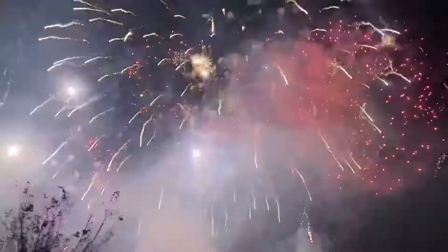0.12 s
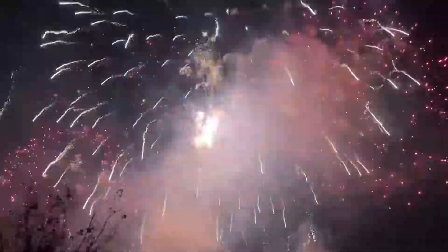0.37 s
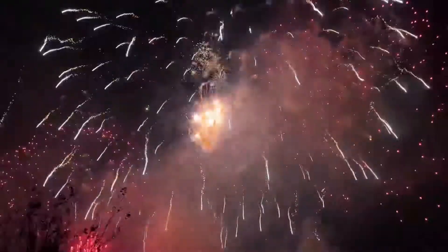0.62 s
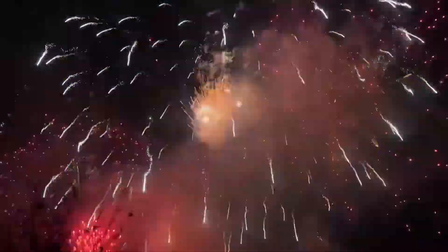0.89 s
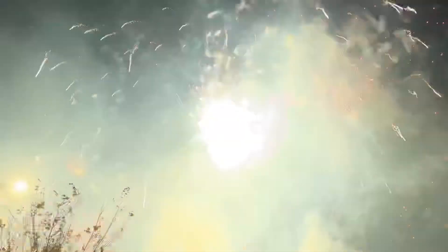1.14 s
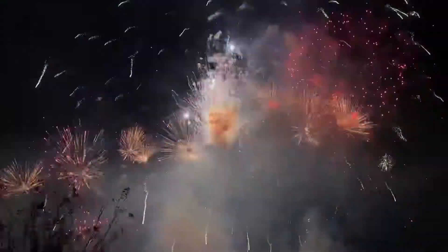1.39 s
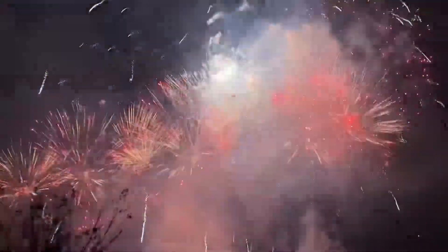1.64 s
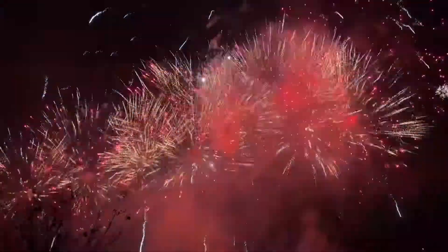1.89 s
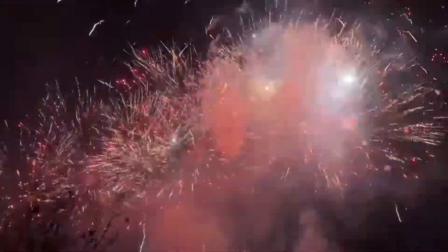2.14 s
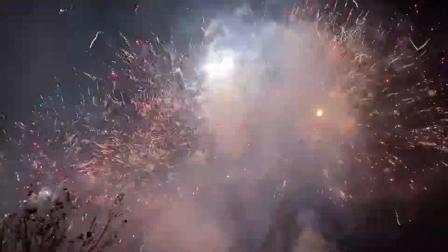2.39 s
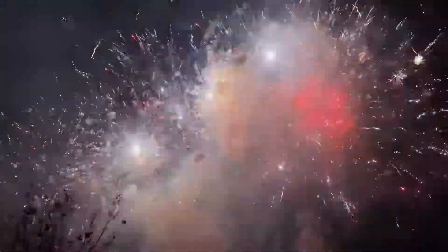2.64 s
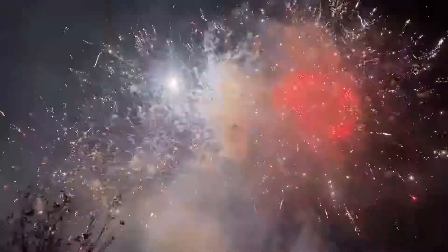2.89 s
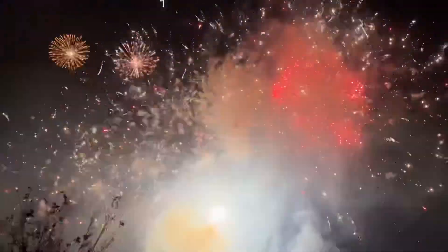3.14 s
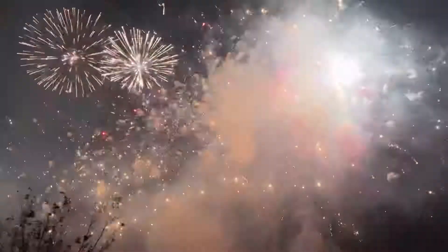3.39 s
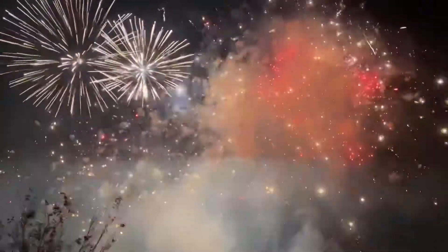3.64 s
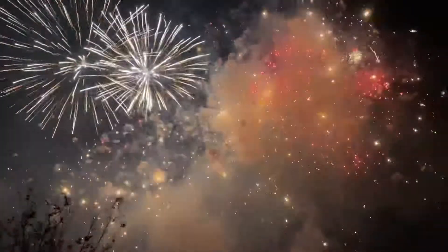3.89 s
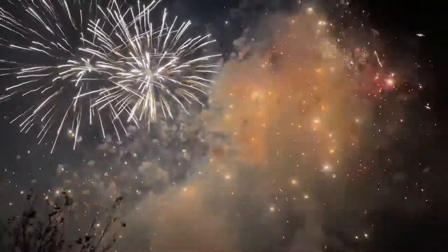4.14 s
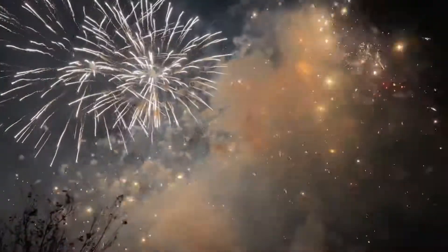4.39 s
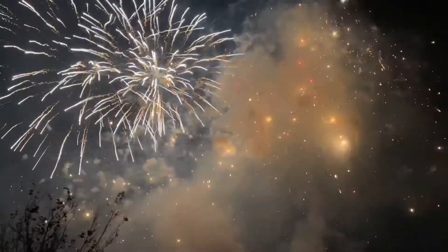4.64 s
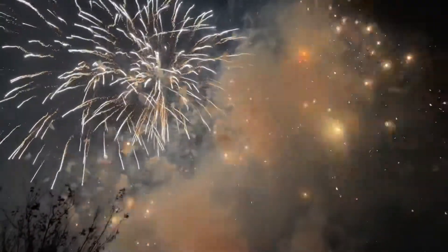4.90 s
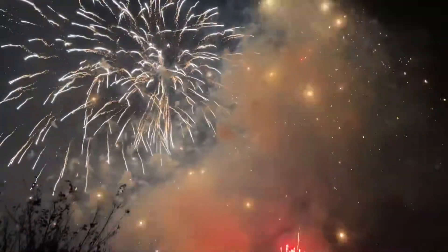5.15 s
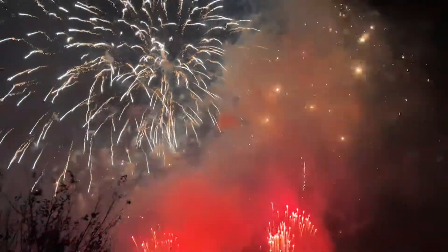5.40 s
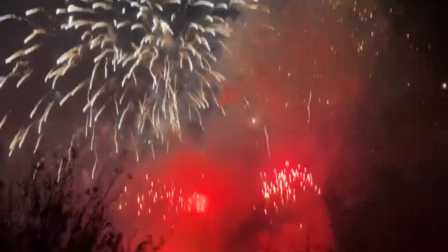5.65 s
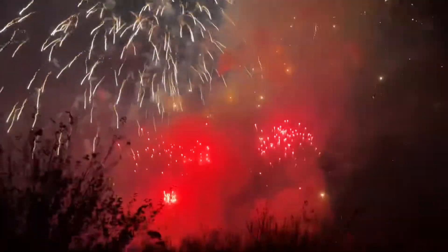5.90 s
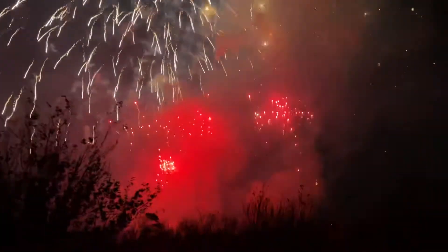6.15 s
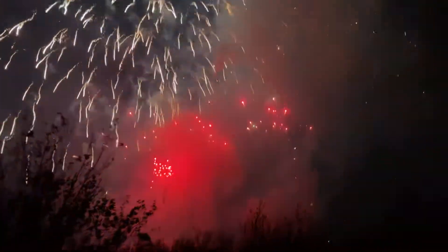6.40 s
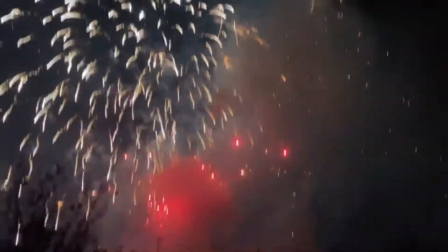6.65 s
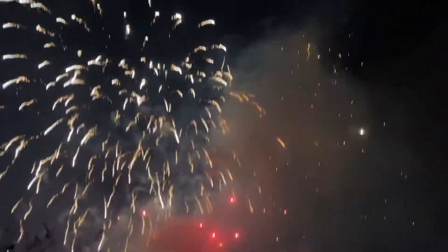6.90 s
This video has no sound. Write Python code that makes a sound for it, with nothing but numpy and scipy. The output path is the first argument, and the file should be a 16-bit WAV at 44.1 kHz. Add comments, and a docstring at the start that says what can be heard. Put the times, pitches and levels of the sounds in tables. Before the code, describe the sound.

Firework shells crackle at machine-gun density in the open air, loud and slightly squashed by a small recorder. A very brief, faint rising whistle is buried early, along with a deep mortar thump. After three seconds the bursts grow sparser and stop; echo from distant slopes decays. Several punchy launches crack near five seconds, one duller thud follows, then only rolling reverberation and tiny faint ticks.

```python
"""Hundreds of firework shells burst overhead at night; a brief rising whistle sounds among the first ones.
A mortar fires early; after the barrage has ended more crack and thump. Echo rolls over a faint rumble.
Each burst is a blast wave with a ground bounce and a noise crack; the recorder's filters smear it into
a falling chirp. Echoes are noise that takes up the sound's energy and decays at a rate set by frequency."""
import sys
import numpy as np
from scipy import signal
from scipy.fft import rfft, irfft, next_fast_len
from scipy.io import wavfile
from scipy.ndimage import uniform_filter1d

SR = 44100
rng = np.random.default_rng(int(sys.argv[2]) if len(sys.argv) > 2 else 0)


def dump_mix(stems):
    """Bounce the given channels to the path in sys.argv[1] as a 16-bit WAV at rate SR."""
    frames = np.atleast_2d(stems).T  # one column per channel
    limited = np.clip(frames, -1, 1)  # hard clip at full scale
    pcm = np.round(limited * 32767).astype(np.int16)
    wavfile.write(sys.argv[1], SR, pcm)


def boost(x):
    """Linear amplitude factor 10**(x/20) for a level x in decibels (scalar or array-like)."""
    u = np.asarray(x, float) / 20
    return 10 ** u


N = 310002
LEAD_IN = 2 * SR  # samples ahead of the start, so that echoes of earlier bursts are already rolling

# bursts and their slap echoes, placed one by one: t/s, blast level/dB, blast duration/ms, treble at 6 kHz/dB
PLACED_BURSTS = [(0.0499, -5.5, 0.52, 2), (0.065, -11.5, 1.2, 1), (0.0861, -14.5, 1.4, 4),
                 (0.1, -15, 0.53, 1), (0.1366, -7.5, 0.71, 5), (0.152, -11, 0.47, -9), (0.173, -9, 1.9, -2),
                 (0.1836, 2, 0.22, -4.5), (0.194, -14.5, 1.6, 4.5), (0.208, -9, 0.37, -2.5),
                 (0.2215, -6, 0.49, 4), (0.236, -7, 0.55, 7), (0.2421, -9, 0.87, -7),
                 (0.2525, -12.5, 0.31, 3), (0.2556, -5.5, 0.53, -9), (0.27, -12, 0.3, -13),
                 (0.3041, -8, 0.76, -2), (0.3204, -1, 0.26, -3), (0.3301, -15.5, 1.2, 1.5),
                 (0.3439, 1.5, 0.18, -6.5), (0.364, -8, 0.89, 4.5), (0.379, -15.5, 1, 1),
                 (0.408, -16.5, 1.1, -2), (0.416, -11.5, 0.91, 2), (0.421, -8, 0.83, 7),
                 (0.4473, -6, 0.64, 1), (0.4628, -12.5, 1, -5.5), (0.5339, -4, 1.9, 7.5),
                 (0.541, 5.5, 0.1, -9.5), (0.5491, -2, 0.23, -5.5), (0.5638, -6, 0.34, 3.5),
                 (0.5713, -6.5, 0.43, -2.5), (0.5746, -4, 0.41, 3.5), (0.591, -14.5, 0.54, -2),
                 (0.623, -3, 0.64, 1.5), (0.641, -14, 1.1, 6.5), (0.644, -9.5, 0.48, -5.5),
                 (0.6562, -9, 0.68, -3.5), (0.6596, 0, 0.24, -3), (0.6758, -8.5, 0.44, 0),
                 (0.688, -10, 2.2, -0.5), (0.709, -4.5, 0.3, -1.5), (0.721, -4.5, 0.29, -14.5),
                 (0.7495, -14.5, 0.38, -0.5), (0.7582, -11, 0.91, 0), (0.7763, -17, 0.93, 7),
                 (0.7911, -4, 0.87, -3.5), (0.7981, -16.5, 0.66, 0), (0.8065, -6, 1.1, -1.5),
                 (0.809, -10, 0.68, 0.5), (0.816, -6.5, 0.52, -0.5), (0.826, -6, 0.29, 1),
                 (0.857, -9.5, 0.32, 1.5), (0.866, -11.5, 0.31, 4.5), (0.8712, -8, 0.48, -7),
                 (0.9075, -6, 0.61, 3.5), (0.922, -8, 0.69, 0), (0.9389, -15, 1.5, -3),
                 (0.9453, -9, 0.83, 1.5), (0.958, -13, 0.81, -3.5), (0.997, -18.5, 0.56, 3),
                 (1.0091, -2.5, 0.14, 0.5), (1.014, -4, 0.56, -8.5), (1.0217, -10.5, 0.67, -2),
                 (1.061, -9.5, 0.82, -3), (1.1212, -11.5, 1.1, 1), (1.1253, -11.5, 0.79, -8),
                 (1.1373, -9, 1, -1), (1.152, -14, 0.83, 0.5), (1.1878, -7.5, 0.69, 0),
                 (1.1965, -6, 0.62, -2), (1.2666, -8, 0.99, 3.5), (1.2791, -11, 0.43, -4.5),
                 (1.3001, -2.5, 0.86, 1), (1.3033, -12, 1.04, -1), (1.3132, -4.5, 0.22, 0),
                 (1.3161, -5, 0.23, -3.5), (1.3458, -5, 0.51, 3.5), (1.3541, -9.5, 0.63, 0.5),
                 (1.3586, -9.5, 1.5, -2), (1.361, -1.5, 0.29, 0.5), (1.372, -10, 0.64, 3),
                 (1.378, -22.5, 0.49, -2.5), (1.3978, -4, 1.1, 1.5), (1.4057, -8.5, 0.96, 1),
                 (1.411, -5.5, 0.45, -9), (1.4446, -4.5, 0.62, 6), (1.476, 0, 0.38, -0.5),
                 (1.484, -2.5, 0.35, 2), (1.4937, -7.5, 0.73, -0.5), (1.5, -8, 1.05, -11),
                 (1.513, -4, 1, 5), (1.5252, -7.5, 0.68, -1), (1.5432, -9, 0.45, -2.5),
                 (1.548, -15.5, 0.28, -3), (1.5668, -17, 0.47, -4), (1.5828, -19.5, 0.76, 10),
                 (1.589, -13, 0.51, -2.5), (1.5995, -13.5, 0.92, 5), (1.6055, -7, 0.83, -4),
                 (1.6288, -8.5, 1.2, -8.5), (1.652, -11, 0.45, 3.5), (1.657, -6.5, 0.21, -2),
                 (1.6725, -3, 0.45, -3), (1.6862, -9, 1.3, 8), (1.7009, -6, 0.3, 0), (1.7154, -13, 0.51, 4),
                 (1.7253, -7, 0.47, -1), (1.7313, -10, 0.9, 5), (1.7362, -12.5, 0.32, 4),
                 (1.743, -8.5, 0.35, -4), (1.7656, -4, 0.48, -2), (1.7768, -17, 0.46, 7),
                 (1.787, -8, 0.17, -1.5), (1.792, -13.5, 0.77, 2.5), (1.802, -8, 0.7, 4),
                 (1.8049, -11.5, 0.31, -5), (1.8153, -5, 0.57, 2), (1.8211, -8, 0.93, 2),
                 (1.8335, -0.5, 0.53, 0.5), (1.8381, -6, 1.5, 6), (1.847, -4.5, 0.33, -1),
                 (1.8523, -8.5, 0.57, -6.5), (1.8572, -10, 0.43, 2.5), (1.866, -6, 0.49, 4.5),
                 (1.8756, -8, 0.22, 2.5), (1.881, -10, 0.36, -0.5), (1.8868, -15, 0.46, -3.5),
                 (1.9, -14.5, 0.92, -2), (1.9064, -14, 0.56, 0), (1.9161, -8, 0.55, 3.5),
                 (1.921, -0.5, 0.22, 1.5), (1.9316, -4, 0.81, -3), (1.938, -11, 0.48, 6.5),
                 (1.954, -11, 0.83, 3.5), (1.971, -9, 0.53, 7), (1.9794, -13, 0.47, -0.5),
                 (1.9868, -17, 0.68, -2), (1.995, -13.5, 0.86, -7.5), (2.021, -14, 0.32, 1.5),
                 (2.0382, -16, 0.75, 2), (2.044, -5.5, 0.35, -1), (2.069, -3, 0.52, -1),
                 (2.0767, -11.5, 0.48, 2), (2.08, -12, 0.63, 1), (2.0884, -10, 0.9, 4.5),
                 (2.0954, -5, 0.49, 0.5), (2.1028, -7, 0.28, 4), (2.108, -12, 0.6, 1.5),
                 (2.114, -8, 1.2, -3), (2.14, -14.5, 0.4, 5), (2.1482, -10.5, 1.3, 2),
                 (2.1613, -14, 0.2, -8), (2.1727, -6.5, 0.13, -2.5), (2.1785, -20.5, 0.21, 2.5),
                 (2.197, -8, 0.15, 5.5), (2.2018, -6, 0.79, -9.5), (2.2075, -11, 0.93, 0.5),
                 (2.2125, -5, 0.42, -6), (2.2296, -7.5, 0.47, 1.5), (2.2345, -15.5, 0.47, 3),
                 (2.239, -2.5, 0.16, -1), (2.2587, -9, 0.49, 6), (2.269, -7.5, 0.41, 0),
                 (2.2812, -10, 0.25, 4), (2.305, -14.5, 0.41, 4.5), (2.3131, -10.5, 0.57, -1.5),
                 (2.3288, -17.5, 0.3, -2.5), (2.3526, -29, 1, -4.5), (2.3652, -5, 0.15, -1.5),
                 (2.3736, -5, 0.42, -4.5), (2.385, -14.5, 0.35, 0), (2.4031, -8, 0.84, 0),
                 (2.4151, -9.5, 0.62, -17), (2.434, -26.5, 0.76, -2), (2.448, -16.5, 0.48, 0),
                 (2.4824, -8, 0.35, 7), (2.494, -9.5, 1.7, 0.5), (2.5038, -4, 0.53, 3),
                 (2.5113, -8.5, 0.41, -1.5), (2.529, -2, 0.11, -3), (2.5422, -11, 1.2, -3),
                 (2.5554, -9, 1.3, 2.5), (2.5842, -16.5, 0.53, 4), (2.599, -17, 0.93, 3.5),
                 (2.615, -9, 0.62, 2), (2.628, -5.5, 0.28, -3.5), (2.6477, -8, 1.1, 0),
                 (2.6545, -10.5, 0.74, 3), (2.6628, -4.5, 0.37, 1.5), (2.6842, -20, 0.79, -6),
                 (2.6978, -21.5, 0.59, 3.5), (2.7162, -11.5, 1, -7), (2.743, -6.5, 0.34, 1),
                 (2.7539, -8, 0.52, 1), (2.7678, -7, 0.81, 5.5), (2.778, -18.5, 0.56, 3.5),
                 (2.7828, -8.5, 0.43, 2), (2.8001, -12.5, 0.97, 3.5), (2.8181, -9.5, 0.98, -0.5),
                 (2.829, -6, 0.22, 2), (2.8525, -15, 2.4, 0.5), (2.8676, -8, 0.5, 1),
                 (2.8896, -10, 0.23, -3), (2.9178, -12, 0.86, -3), (2.9286, -16, 1.5, 6.5),
                 (2.9351, -5, 0.39, -4), (2.9611, -12.5, 1.4, 5.5), (2.9869, -10, 0.91, -0.5),
                 (2.9922, -14, 1.5, 3), (3.008, -15, 0.97, -4), (3.016, -12.5, 0.58, 4),
                 (3.029, -13, 0.73, 3), (3.039, -14, 0.46, -13.5), (3.049, -14, 1.5, -2.5),
                 (3.058, -14, 0.4, -3.5), (3.0619, -6, 0.23, 1.5), (3.0707, -12, 0.5, -6.5),
                 (3.0962, -17, 0.82, 1.5), (3.108, -13, 1, -8), (3.1197, -18.5, 1.1, 3),
                 (3.142, -8, 0.9, 3.5), (3.1532, -16, 0.74, 4.5), (3.1621, -14.5, 0.78, 7),
                 (3.1732, -9.5, 1.6, -7), (3.18, -15.5, 0.62, -8), (3.2002, -12, 1, 0.5),
                 (3.222, -13, 0.92, 4), (3.2343, -10, 0.27, -13), (3.2385, -6, 0.25, -5),
                 (3.254, -11, 0.28, 2.5), (3.2631, -7.5, 0.67, -2), (3.279, -26, 0.62, -9),
                 (3.3132, -15, 0.37, 4), (3.3512, -20.5, 0.92, -9.5), (3.3618, -11, 0.6, -1.5),
                 (3.3722, -9, 0.17, -2), (3.3939, -11.5, 0.57, -10.5), (3.4024, -12.5, 0.4, 5),
                 (3.422, -12.5, 0.48, -2), (3.4742, -14.5, 1.1, 5.5), (3.485, -8, 0.63, -18),
                 (3.508, -8, 0.66, -24), (3.524, -25.5, 0.36, 3.5), (3.5434, -9, 0.62, -3.5),
                 (3.5758, -12, 1.7, 1), (3.5826, -12.5, 2, -7), (3.5958, -18, 0.37, 3.5),
                 (3.673, -13, 0.7, 1.5), (3.7067, -7.5, 0.49, 4), (3.7089, -10, 1.15, 2),
                 (3.7243, -9.5, 0.36, -12.5), (3.76, -14.5, 5.4, -2), (3.8167, -4.5, 0.29, 0.5),
                 (3.8325, -14, 1.8, -2), (3.84, -8, 0.25, -1), (3.8511, -6.5, 0.34, -12),
                 (3.884, -22, 0.64, -3), (3.896, -18.5, 0.57, -7), (3.96, -17, 0.56, 0),
                 (3.964, -17.5, 0.74, 4), (3.991, -9, 0.61, 3.5), (3.9966, -17, 0.71, -8),
                 (4.0126, -14.5, 1.1, -10), (4.0477, -14.5, 0.79, 3.5), (4.14, -16.5, 1.1, -4),
                 (4.1567, -21.5, 1.7, 2), (4.2333, -19.5, 1.2, 0), (4.2375, -13.5, 0.84, -0.5),
                 (4.2489, -8.5, 0.48, -12), (4.299, -13, 0.97, 3), (4.3149, -18, 1.2, -2),
                 (4.3825, -10.5, 0.91, 6.5), (4.397, -26, 1.1, -10), (4.4047, -13.5, 1.2, 1.5),
                 (4.4555, -10.5, 1.2, 4.5), (4.471, -22, 0.84, -5.5), (4.5868, -13.5, 1.2, 2.5),
                 (4.601, -17, 1.3, -16), (6.629, -24, 0.066, -45), (6.857, -19, 0.045, -46)]
# smaller bursts, three parallel lists: t/s; rate/(1/s); upper blast level/dB before the duration term
CROWD_T_S = [-1, -.01, 0, 1.44, 1.48, 1.75, 2, 2.28, 2.35, 2.45, 2.5, 2.77, 3.07, 3.085, 3.1, 3.25, 3.29]
CROWD_RATE_PER_S = [64, 60, 0, 0, 380, 420, 399.5, 380, 150, 150, 400, 418, 420, 60, 400, 300, 0]
CROWD_LEVEL_DB = [1, -3, -17, -11.5, -10.5, -11.5, -8.5, -15, -14.5, -14.5, -14.5, -14.5, -11, -16, -11.5,
                  -18, -18.5]
# mortar launches on the ground: t/s, crack level/dB, thump level/dB, crack treble at 6 kHz/dB
LAUNCHES = [(0.534, -19.5, -5, -14.5), (5.097, -16.5, -46.5, -18), (5.1126, -6, -18, -14),
            (5.256, -14, -42, -25), (5.271, -9, -21.5, -12), (5.3061, -3.5, -14.5, -15),
            (5.498, -6, -17, -12.5), (5.8151, -20.5, -24.5, -29)]
# walls that return a mortar's thump: delay/s, level/dB
THUMP_RETURNS = [(.055, -9), (.18, -13), (.44, -13)]
# trees that scatter a mortar's crack back: delay/s, level/dB
CRACK_RETURNS = [(.048, -26.5)]
# decay by nearby walls and trees: f/Hz, t60/s
NEAR_T60 = [(60, 0.72), (300, 0.12), (1500, 0.08), (6000, 0.12), (14000, 0.075)]
# decay by distant slopes: f/Hz, t60/s
FAR_T60 = [(50, 3), (150, 3.7), (300, 7.8), (1000, 5.5), (2000, 2.9), (3000, 2.5), (4200, 1.7), (6000, 1.4),
           (8000, 1.1)]
# what the long way round keeps: f/Hz, level/dB
FAR_PATH = [(40, 4), (90, 0.5), (150, -7), (300, -3.5), (1000, -3.5), (3000, 1.5), (4200, 0.5), (6000, 1),
            (8000, -5)]
# left-right likeness of diffuse sound: f/Hz, likeness (-1..1)
DIFFUSE_LIKENESS = [(60, 0.99), (180, 0.91), (550, -0.11), (1650, 0.37), (4970, -0.052), (15000, -0.3)]
# balance of diffuse sound: f/Hz, left minus right/dB
DIFFUSE_BALANCE = [(60, -5), (380, -1), (2380, -1), (15000, 0.5)]
# distant rumble, relative spectrum: f/Hz, level/dB
RUMBLE_SPECTRUM = [(18, -29), (30, -6.5), (80, -6), (150, -11.5), (402, -9), (507, -9), (8000, -44.5),
                   (10400, -86.5), (17600, -120)]
# balance of direct sound: f/Hz, left minus right/dB
DIRECT_BALANCE = [(60, -1), (130, -2.5), (290, -1), (640, -2.5), (1410, -6), (3100, 1), (6820, 4),
                  (15000, -3)]
# phase of direct sound: f/Hz, left lead/rad
DIRECT_LEAD = [(0, 0), (2300, .3), (3500, 1.6), (4700, .3), (6500, -3.2), (8200, -3.2), (9900, -6.1),
               (12200, -6.5), (13400, -9.3), (17000, -12.5)]
# air and microphone: f/Hz, gain/dB
MIC_RESPONSE = [(25, -24.5), (45, 4.5), (70, 10), (160, 13), (280, 16), (450, 9), (700, 9), (1500, 5.5),
                (3200, 3), (5000, -3.5), (6700, -4.5), (7600, -11), (11000, -14.5), (14000, -26.5),
                (17000, -45.5)]
# recorder's second-order allpasses: f/Hz, Q (1/damping)
RECORDER_ALLPASS = [(59.7, 1.05), (151, 1.33), (310, 1.29)]


def along(points, hz):
    """Interpolates (Hz, value) points on a log frequency axis."""
    f, v = np.transpose(points)
    return np.interp(np.log(hz + 1), np.log(f + 1), v)


def filtered(x, response):
    """Multiplies the spectrum of x by a complex response of frequency."""
    m = next_fast_len(x.shape[-1] + SR // 2)
    spectrum = rfft(x, m) * response(np.fft.rfftfreq(m, 1 / SR))
    return irfft(spectrum, m)[..., :x.shape[-1]]


def stereo(pair):
    """Mixes two unrelated noises to the left-right likeness and balance of diffuse sound."""
    def shares(hz):
        angle = np.arccos(np.clip(along(DIFFUSE_LIKENESS, hz), -1, 1)) / 2
        return np.array([np.cos(angle), np.sin(angle)])

    mid, side = filtered(pair, shares)
    left_right = np.array([mid + side, mid - side])
    return filtered(left_right, lambda hz: boost(along(DIFFUSE_BALANCE, hz) * [[.5], [-.5]]))


def night():
    """Steady low rumble from far away: shaped noise."""
    rumble_db = -62.0  # rms ahead of the microphone
    hum = filtered(stereo(rng.standard_normal((2, N))), lambda hz: boost(along(RUMBLE_SPECTRUM, hz)))
    return boost(rumble_db) * hum / hum.std()


def echoes(x, t60, gap_s, patchy_db, size):
    """Countless reflections: noise takes up the sound's energy; each frequency dies at its own speed."""
    frames = dict(fs=SR, nperseg=size, noverlap=size * 3 // 4)
    delayed = np.pad(x, (round(gap_s * SR), 0))[:len(x)]
    hz, t, z = signal.stft(delayed, **frames)
    energy = np.abs(z) ** 2
    # many paths even out the treble's fine colour
    blurred = np.abs(uniform_filter1d(energy, size=size // 32, axis=0))
    energy = np.where(hz[:, None] > 1000, blurred, energy)
    keep = boost(-60 * t[1] / along(t60, hz)) ** 2  # energy kept per hop
    energy = np.array([signal.lfilter([1 - k], [1, -k], row) for k, row in zip(keep, energy)])

    noise = signal.stft(rng.standard_normal((2, len(x))), **frames)[2]
    lumps = uniform_filter1d(rng.standard_normal(z.shape), size=8, axis=0)
    lumps = uniform_filter1d(lumps, size=5, axis=1)
    noise = noise / np.sqrt(np.mean(np.abs(noise) ** 2)) * boost(patchy_db * lumps / lumps.std())
    tail = signal.istft(noise * np.sqrt(energy), **frames)[1]
    return stereo(tail[:, :len(x)])


def whistle():
    """Rough tone whose pitch climbs; it swells, fades and stops."""
    start_s, length_s, from_hz, to_hz, level_db = .15, 0.036, 1600, 2110, -30
    t = (np.arange(N + LEAD_IN) - LEAD_IN) / SR - start_s
    share = np.clip(t / length_s, 0, 1)
    hz = from_hz + (to_hz - from_hz) * share
    swell = np.sqrt(np.abs(np.sin(np.pi * share))) * (share < 1)
    rough = 1 + 6.5 * uniform_filter1d(rng.standard_normal(len(t)), size=40)
    return boost(level_db) * swell * rough * np.sin(2 * np.pi * np.cumsum(hz) / SR)


def blasts(s, db, ms, treble_db, bounce, bounce_ms, crack_db, crack_ms, crack_hz,
           size=1024, bounce_scatter=0.45, lag_ms=0.0038):
    """Pressure steps that sag into suction, again off the ground, with a ragged crack at the front."""
    luck = rng.standard_normal((len(s), 3))
    hz = np.fft.rfftfreq(size, 1 / SR)
    jw = 2j * np.pi * hz
    at = s * SR + LEAD_IN - size // 8  # room ahead of the front
    start = np.floor(at).astype(int)

    wave = SR * jw / (1000 / ms[:, None] + jw) ** 2
    bounce_s = bounce_ms / 1000 * np.exp(bounce_scatter * luck[:, :1])
    wave = wave * (1 + bounce * np.exp(-jw * bounce_s))

    front = np.exp(-np.arange(size) / (SR * crack_ms / 1000))
    crack = rfft(front * rng.standard_normal((len(s), size)))
    crack = crack * boost(crack_db) * (jw / (jw + 2 * np.pi * crack_hz)) ** 2
    # air takes more treble from far bursts
    wave = (wave + crack) * boost(db[:, None] + treble_db[:, None] * hz / 6000)

    out = []
    for side in (1, -1):
        lag_s = side * lag_ms / 1000 * luck[:, 1:2]  # direction shifts the lag between ports
        delay_s = (at - start + size // 8)[:, None] / SR + lag_s
        pulse = irfft(wave * np.exp(-jw * delay_s), size) * boost(.5 * side * luck[:, 2:])
        place = start[:, None] + np.arange(size)
        total = np.bincount(place.ravel(), pulse.ravel(), N + LEAD_IN + size)
        out.append(total[:N + LEAD_IN])
    return np.array(out)


def scattered(rows, count=12, spread_s=.025):
    """Trees return a crack as a short flurry of weak copies."""
    flurry = [(s + late, db + loss_db, treble_db)
              for s, db, _, treble_db in rows for late, loss_db in CRACK_RETURNS]
    s, db, treble_db = np.repeat(flurry, count, axis=0).T
    luck = rng.random((len(s), 2))
    return s + spread_s * luck[:, 0] ** 2, db - 10 * luck[:, 1], treble_db


def mortars():
    """Short dull crack from the tube's mouth; deep thump of the air in the tube, sent back by far walls."""
    s, crack_db, thump_db, treble_db = np.transpose(LAUNCHES)
    same = np.ones_like(s)
    when, level_db, top_db = np.hstack([[s, crack_db, treble_db], scattered(LAUNCHES)])
    crack = blasts(when, level_db, np.full(len(when), 0.2), top_db, bounce=0.55, bounce_ms=1.24,
                   crack_db=-10.0, crack_ms=3, crack_hz=693)
    push = blasts(s, thump_db, 11 * same, -30 * same, bounce=0.18, bounce_ms=12, bounce_scatter=0,
                  crack_db=-40, crack_ms=4.0, crack_hz=704, size=4096)
    tube_hz, width_hz, wall_hz = 140, 150, 110

    def tube_and_walls(hz):
        tube = tube_hz ** 2 / (tube_hz ** 2 - hz ** 2 + 1j * hz * width_hz)
        returns = sum(boost(db) * np.exp(-2j * np.pi * hz * late) for late, db in THUMP_RETURNS)
        return tube * (1 + returns / (1 + 1j * hz / wall_hz) ** 2)

    return crack + filtered(push, tube_and_walls)


def slaps(count=3, loss_db=-15, spread_ms=24):
    """A few weaker, longer copies soon after each placed burst, off things nearby."""
    s, db, ms, treble_db = np.repeat(PLACED_BURSTS, count, axis=0).T
    luck = rng.random((len(s), 3))
    late_s = spread_ms / 1000 * (0.0998 + luck[:, 0])
    return np.array([s + late_s, db + loss_db - 8 * luck[:, 1], ms * (1.2 + .5 * luck[:, 2]), treble_db])


def small_bursts(count=2200, seconds=4.4):
    """Smaller shells at random moments and sizes; candidates are thinned to the rate table."""
    typical_ms, log_spread = 0.58, 0.51  # blast duration
    size_range_db, short_gain_db = 10.5, 2.5  # range below the upper level; gain per factor e shorter
    typical_treble_db, treble_spread_db = -1.5, 3.5  # at 6 kHz
    luck, scatter = rng.random((count, 3)), rng.standard_normal((count, 2))
    # fused in rapid fire: spread nearly evenly with some jitter; the rate table sets the lulls
    when = CROWD_T_S[0] + seconds * (np.arange(count) + 2 * luck[:, 0]) / count
    kept = luck[:, 1] * count / seconds < np.interp(when, CROWD_T_S, CROWD_RATE_PER_S)
    stretch = log_spread * scatter[:, 0]
    upper_db = np.interp(when, CROWD_T_S, CROWD_LEVEL_DB)
    level_db = upper_db - size_range_db * luck[:, 2] - short_gain_db * stretch
    treble_db = typical_treble_db + treble_spread_db * scatter[:, 1]
    return np.array([when, level_db, typical_ms * np.exp(stretch), treble_db])[:, kept]


def shells():
    """Every burst in the sky is the same kind of blast; the bursts placed one by one also slap back."""
    rows = np.hstack([np.transpose(PLACED_BURSTS), small_bursts(), slaps()])
    return blasts(*rows, bounce=0.41, bounce_ms=1.031, crack_db=-10, crack_ms=0.7, crack_hz=2504)


def scene():
    """Shells, whistle and mortars with near and far echoes, over the night's rumble."""
    skim_hz = 2530  # sound skimming the ground to walls and slopes loses treble above this
    sky, ground = shells() + whistle(), mortars()
    skimmed = filtered(ground, lambda hz: 1 / (1 + 1j * hz / skim_hz))
    mid = (sky + skimmed).mean(axis=0)

    near_feed = filtered(mid, lambda hz: hz / np.hypot(hz, 250))
    near = boost(-6.0) * echoes(near_feed, NEAR_T60, gap_s=0.0011, patchy_db=4.5, size=512)
    far_feed = filtered(mid, lambda hz: boost(along(FAR_PATH, hz)))
    far = boost(-10.5) * echoes(far_feed, FAR_T60, gap_s=0.016, patchy_db=1.66, size=2048)

    def ports(hz):
        halves = np.array([[.5], [-.5]])
        lead_rad = np.interp(hz, *np.transpose(DIRECT_LEAD))
        return boost(along(DIRECT_BALANCE, hz) * halves) * np.exp(1j * lead_rad * halves)

    direct = filtered(sky + ground, ports)
    return (direct + near + far)[:, LEAD_IN:] + night()


def roll_off(x):
    """The treble ends steeply here."""
    return signal.sosfilt(signal.butter(12, 16960, fs=SR, output="sos"), x)


def record(dry):
    """Air and microphone colour, allpass filters that delay the bass, a soft ceiling."""
    def recorder(hz):
        phase_rad = sum(-2 * np.arctan2(hz * c / q, c * c - hz * hz) for c, q in RECORDER_ALLPASS)
        return boost(along(MIC_RESPONSE, hz)) * np.exp(1j * phase_rad)

    x = filtered(dry, recorder)
    x = x / (1 + np.abs(x) ** 6) ** (1 / 6)
    return roll_off(x)


dry = scene()
out = record(dry)
dump_mix(out)
```